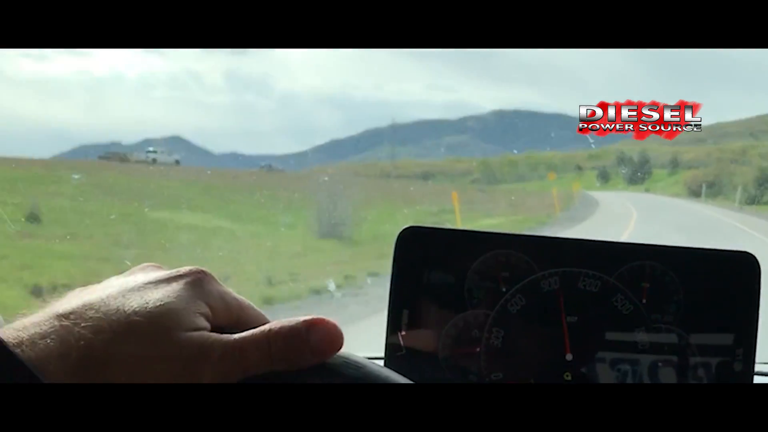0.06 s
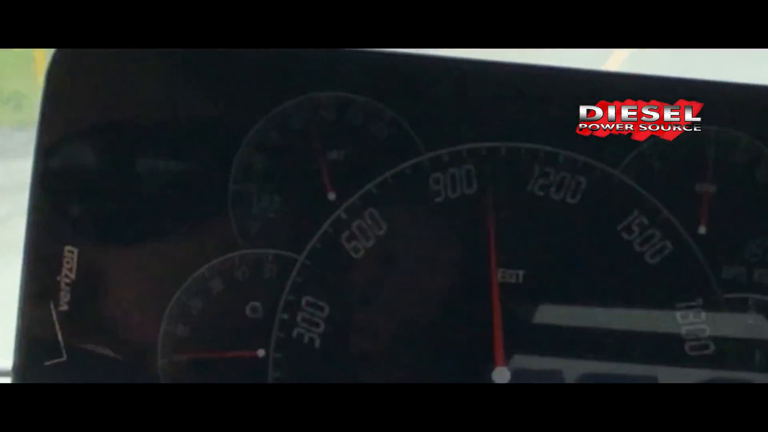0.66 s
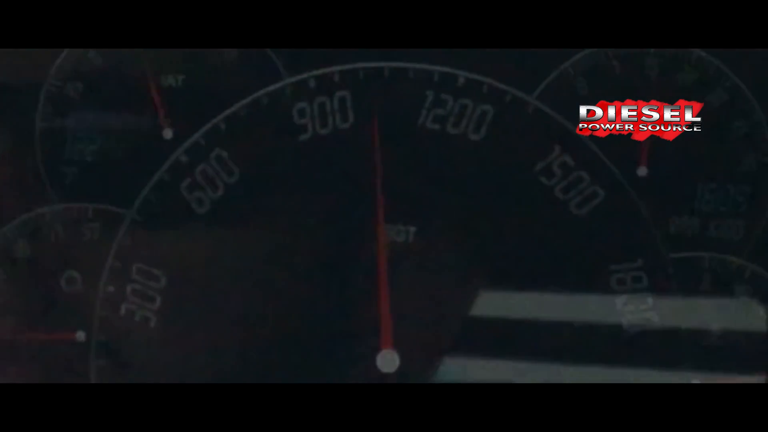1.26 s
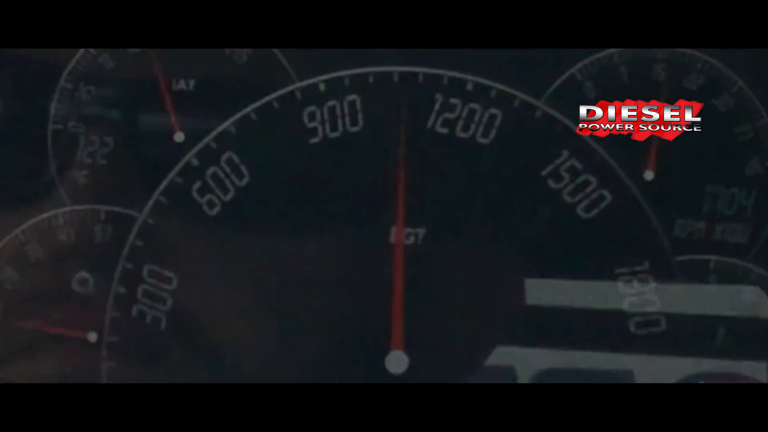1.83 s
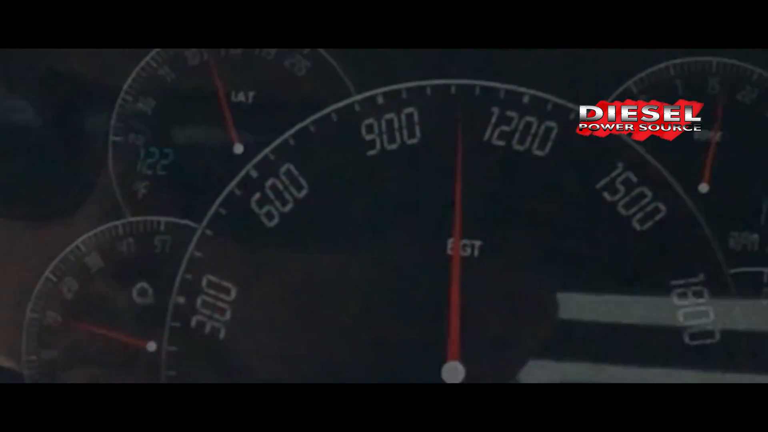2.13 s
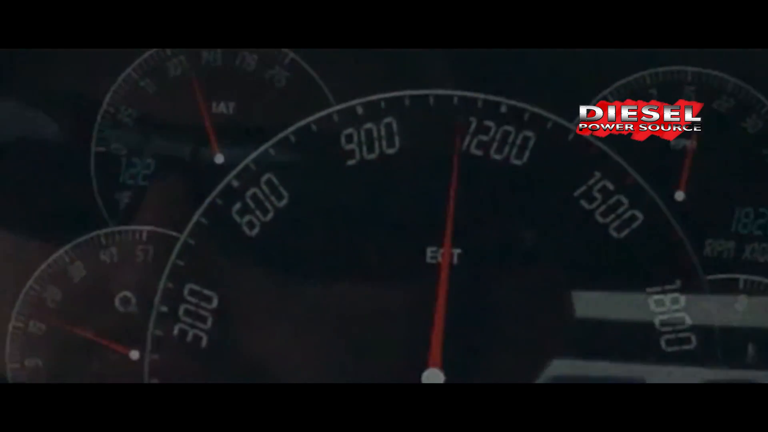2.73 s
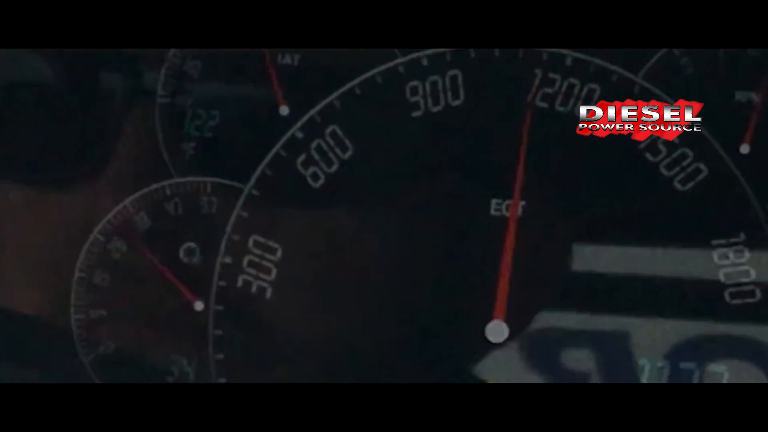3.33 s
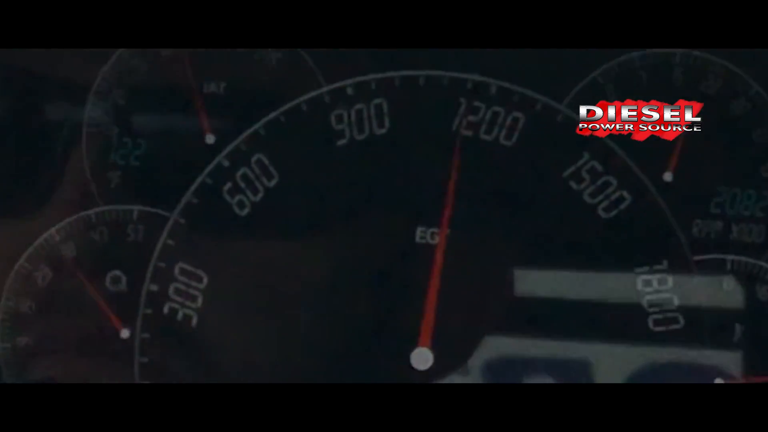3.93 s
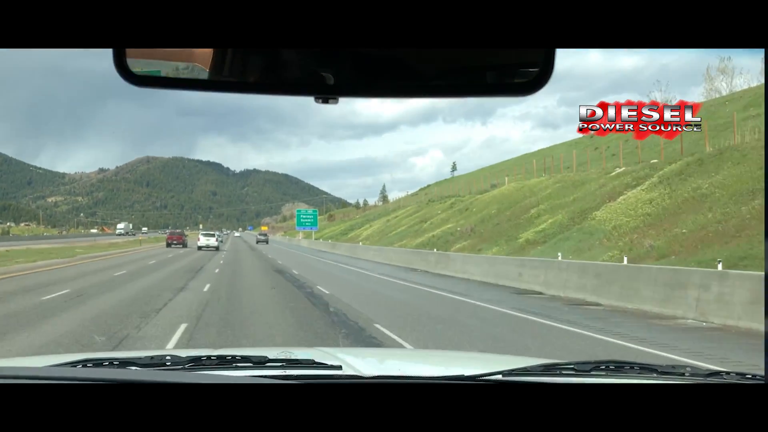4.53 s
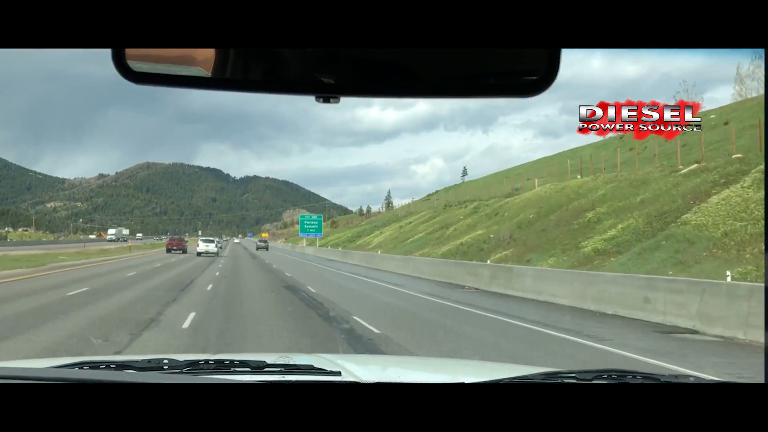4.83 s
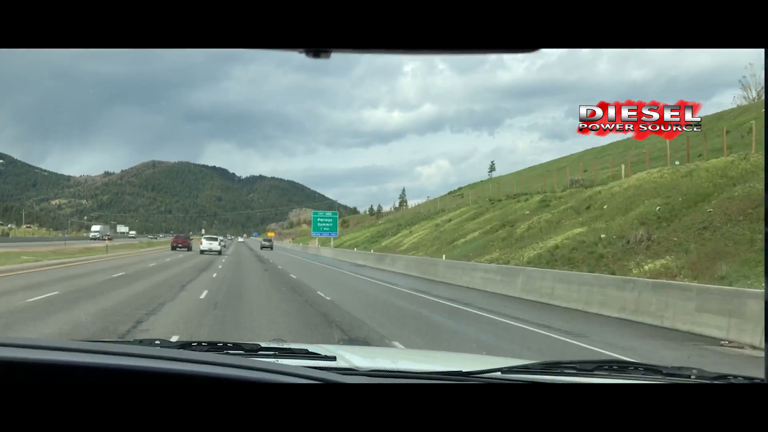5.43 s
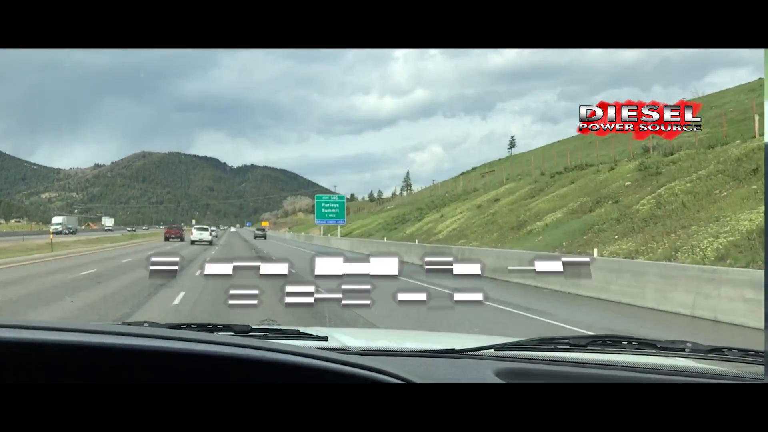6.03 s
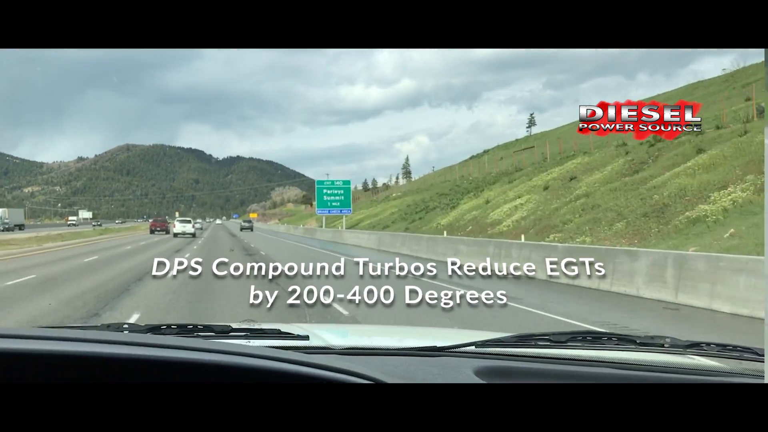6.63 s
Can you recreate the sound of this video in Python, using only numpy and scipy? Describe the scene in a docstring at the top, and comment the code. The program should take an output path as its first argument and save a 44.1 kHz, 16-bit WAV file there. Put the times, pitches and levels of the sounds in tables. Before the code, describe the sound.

A diesel truck pulls a heavy load uphill, heard from inside the closed cab. It opens with a very brief low thump, straight into a deep engine boom that climbs steadily in pitch for the whole six and a half seconds or so, swelling and dipping as the cab resonates. Exhaust pulsing and fine, rapid injector clatter run throughout. A thin turbo whistle starts faint, sweeps upward most quickly between about 1.5 and 4 seconds, flaring as it goes, then stays very high and creeps upward amid airy intake hiss. Low road rumble grows from around 2 seconds and is strongest shortly before 5. Faint, soft rustles pass in the first second or so, and again near 4 and 6 seconds. One close, dry tick sounds at about 6.4 seconds, with the engine still pulling.

```python
"""A deep engine boom climbs steadily, heard inside the cab: a six-cylinder turbo diesel pulling a heavy
load up a grade. The firing note swells and cancels as it crosses the cab's standing waves. Each firing
puffs down the exhaust and knocks through the dash as injector clatter. Two turbos in series spool up
to a high whistle over intake hiss and road rumble, with a few soft rustles and one dry tick."""
import sys
import numpy as np
from scipy.fft import rfft, irfft, next_fast_len
from scipy.io import wavfile
from scipy.ndimage import map_coordinates

SR = 44100
rng = np.random.default_rng(int(sys.argv[2]) if len(sys.argv) > 2 else 0)


def transcribe(u):
    """Save the signal u as a 16-bit wav file named by the first command-line argument.

    u: samples, shape (n,) or (channels, n), limited to [-1, 1]; the rate is SR.
    q: integer samples, one column per channel.
    """
    v = np.clip(np.atleast_2d(u).T, -1, 1)
    q = np.round(v * 32767).astype(np.int16)
    wavfile.write(sys.argv[1], SR, q)


N = 294588

# cab noise likeness: freq_hz, left_right_correlation
STEREO_LIKENESS = [(25, .988), (100, .994), (250, .98), (400, .92), (600, .88), (1000, .925), (2500, .93),
                   (3800, .97), (4900, 1)]
# noise spectra: freq_hz, relative_db
ROAD_SPECTRUM = [(17, -57), (25, -8), (38, -8), (60, -3.5), (90, -6.5), (150, -14.5), (300, -24),
                 (800, -60)]
RUSTLE_SPECTRUM = [(800, -17), (2500, -4), (4500, 0), (6400, -2), (7500, -10), (9000, -5), (10500, -13.5),
                   (15000, -16)]
INTAKE_SPECTRUM = [(2000, 6.5), (5000, -5.5), (8800, 5), (9800, -1), (10450, -11.5), (11400, 0.5),
                   (12500, -4), (13500, -5), (15800, -17)]
EXHAUST_SPECTRUM = [(40, -41), (90, 9.5), (150, 17), (220, 10.5), (300, 12), (380, 5.5), (520, 3), (600, 0),
                    (670, 2), (760, -2.5), (940, -0.5), (1100, -13), (2000, -15.5), (6000, -46)]
CLATTER_SPECTRUM = [(300, -46), (700, -6.5), (1000, -7.5), (1350, -5), (2250, -7.5), (2700, -8.5),
                    (4200, -12.5), (5100, -15.5), (6500, -17), (7400, -21.5), (15000, -42)]
# block and valve train response: freq_hz, relative_db
BUZZ_SPECTRUM = [(200, -15.5), (330, 1.5), (420, 4.5), (560, -3), (680, -10), (760, -18), (930, -7.5),
                 (1200, -21.5), (1600, -37)]
# level curves: time_s, relative_db
ROAD_ENVELOPE = [(0.1, -34), (1.6, -43), (1.82, -32), (4.05, -27), (4.7, -24.5), (5.01, -28), (6.6, -28)]
CLATTER_ENVELOPE = [(0.1, -39.5), (0.82, -38.5), (2.53, -43), (4.55, -39), (6.31, -39), (6.6, -38.5)]
# soft rustles: centre_s, half_length_s, level_db
RUSTLE_SWELLS = [(.42, .06, -48.5), (0.848, 0.6, -49.5), (2.306, 0.013, -55), (4.203, .025, -44),
                 (6.1, 0.052, -51)]
# dry tick: start_s, peak_db
TICK_EVENTS = [(6.4372, -10)]
# intake duct, dash panel and cab air modes: centre_hz, width_hz, gain_db
DUCT_RESONANCES = [(4860, 260, -7), (5190, 170, 7), (5440, 60, 6), (5700, 70, 7), (6020, 260, 12),
                   (7260, 130, 7), (7570, 330, 8), (8010, 200, -7), (8216, 45, 10), (8396, 65, 14),
                   (8495, 50, 7), (8650, 100, 9), (8920, 300, -6), (8937, 30, 6)]
DASH_RESONANCES = [(834, 81, 10), (956, 16, 14), (1162, 176, 8.5), (1604, 62, 8.5), (1766, 130, 3),
                   (2000, 80, 3), (2230, 106, 5.5), (3920, 150, 1), (6000, 130, 6), (6380, 98, 8)]
CAB_RESONANCES = [(59.7, 2.8, 7.5), (83.15, 7.7, 17), (96.5, 3.26, -10), (97.4, 10.8, 10.5), (107.6, 12, 5),
                  (110.1, 1.3, -8), (126, 6, -7), (141, 8.1, 4.5), (149.7, 10.4, 18.5), (165.3, 5.8, -10),
                  (180.6, 19.5, 7.5), (202.6, 21, 9.5), (229.4, 11, 8.5), (251.8, 25, -4.5),
                  (277.3, 28.4, 12.5), (307, 9.6, 8.5), (394.6, 14, 8)]
# spool-up: base_hz, boost_span_hz, halfway_s, time_constant_s, revs_span_hz
BIG_SPOOL = (9800, 1930, 2.1, .28, -30)
SMALL_SPOOL = (3917, 4430, 2.624, .704, 715)
# engine speed: time_s, firing_hz
FIRING_RATE = [(0, 77.6), (1, 81.9), (1.5, 84.9), (2.5, 93.6), (3.5, 103.8), (4.5, 112.5), (5, 117.1),
               (6, 124.8), (6.68, 132)]
# firing note, then its partners, ahead of the cab modes: cycle_multiple, low_revs_db, high_revs_db
MAIN_ORDERS = [(6, -26.5, -16.5), (9, -40.5, -35), (12, -33.5, -35.5), (18, -35.5, -49.5)]
# weaker lines from unequal cylinders: cycle_multiple, low_revs_db, high_revs_db
WEAK_ORDERS = [(3, -37, -28.5), (4, -54.5, -36), (5, -41.5, -51), (7, -64, -38.5), (8, -40, -42.5),
               (10, -53.5, -33.5), (11, -50.5, -37.5), (13, -55, -40.5), (14, -66, -45), (15, -43, -43.5),
               (20, -50, -56), (21, -52.5, -48.5), (22, -58, -54), (24, -51, -61.5), (30, -45.5, -47)]

CYLINDERS = 6
EXHAUST_DB, BUZZ_DB = (-33, -27.5), (-46.5, -42)  # lowest revs, highest revs
INTAKE_DB, WHINE_DB = (-60.5, -47.5), (-69, -61)  # off boost, full boost
WHISTLE_DB, RUSH_DB = (-55, -44), (-58, -43)  # off boost, full boost


def amp(db):
    """Decibels to gain."""
    return 10 ** (np.asarray(db) / 20)


def unit(x):
    """Scale to rms 1."""
    return x / np.sqrt(np.mean(np.abs(x) ** 2) + 1e-20)


def between(ends, share):
    """Blend from ends[0] at share 0 to ends[1] at share 1."""
    return ends[0] + (ends[1] - ends[0]) * share


def along(points, hz):
    """Interpolate (freq_hz, value) rows on a log axis."""
    freq_hz, values = np.transpose(points)
    return np.interp(np.log(hz + 1), np.log(freq_hz + 1), values)


def curve(points):
    """Interpolate (time_s, value) rows per sample."""
    return np.interp(np.arange(N) / SR, *np.transpose(points))


def wobble(rate_hz):
    """Smooth curve through random knots."""
    knots = rng.standard_normal(int(N * rate_hz / SR) + 4)
    return map_coordinates(knots, [np.arange(N) * rate_hz / SR])


def phase_rad(hz):
    """Running phase of a changing frequency."""
    return 2 * np.pi * np.cumsum(hz) / SR


def filtered(x, response):
    """Apply the gain response(hz)."""
    size = next_fast_len(N + SR // 4)
    return irfft(rfft(x, size) * response(np.fft.rfftfreq(size, 1 / SR)), size)[..., :N]


def flutter(width_hz):
    """Complex low-pass noise, rms 1; spreads a tone into a band."""
    real, imag = filtered(rng.standard_normal((2, N)), lambda hz: np.exp(-hz / width_hz))
    return unit(real + 1j * imag)


def resonance_db(modes, hz):
    """Summed gain of peaks and notches."""
    return sum(db / (1 + (2 * (hz - centre_hz) / width_hz) ** 2) for centre_hz, width_hz, db in modes)


def cab_ripple(hz, depth_db, spacing_hz):
    """Many cab reflections ripple a spectrum with peaks and notches."""
    return amp(depth_db * map_coordinates(rng.standard_normal(SR), [hz / spacing_hz]))


def cab_noise(spectrum, gate=1, modes=()):
    """Gated, coloured noise, rms 1, rippled by the cab and nearly alike on both sides."""
    def response(hz):
        colour = amp(along(spectrum, hz) + resonance_db(modes, hz))
        ripple = cab_ripple(hz, depth_db=1.9 * hz / (hz + 1800), spacing_hz=50)
        spread_rad = np.arccos(np.clip(along(STEREO_LIKENESS, hz), -1, 1)) / 2
        return colour * ripple * [np.cos(spread_rad), np.sin(spread_rad)]
    mid, side = filtered(gate * rng.standard_normal((2, N)), response)
    return unit(np.array([mid + side, mid - side]))


def road_rumble():
    """Low road noise through the cab."""
    return amp(curve(ROAD_ENVELOPE) + 3.5) * cab_noise(ROAD_SPECTRUM)


def rustles(side_gain=0.078):
    """Soft swells of brushing noise."""
    t = np.arange(N) / SR
    swells = sum(amp(db) * np.exp(-((t - centre_s) / half_s) ** 2)
                 for centre_s, half_s, db in RUSTLE_SWELLS)
    mid, side = unit(filtered(rng.standard_normal((2, N)), lambda hz: amp(along(RUSTLE_SPECTRUM, hz))))
    return swells * (mid + side_gain * side * [[1], [-1]])


def tick(t60_s=0.0036):
    """Close, dry tick: a sudden step that relaxes."""
    out, t = np.zeros(N), np.arange(SR // 50) / SR
    for start_s, peak_db in TICK_EVENTS:
        out[round(start_s * SR):][:len(t)] -= amp(peak_db - 60 * t / t60_s)
    return out


def thump_gain(length_s=.031, gain_db=13):
    """The sound begins with a brief, loud low thump."""
    return amp(curve([(length_s - .004, gain_db), (length_s, 0)]))


def intake_hiss(boost):
    """Intake air, louder with boost."""
    return amp(between(INTAKE_DB, boost)) * cab_noise(INTAKE_SPECTRUM)


def spool(turbo, revs):
    """S-curve spool-up: boost (0-1) and blade_hz."""
    base_hz, boost_span_hz, halfway_s, lag_s, revs_span_hz = turbo
    boost = 1 / (1 + np.exp((halfway_s - np.arange(N) / SR) / lag_s))
    return boost, base_hz + boost_span_hz * boost + revs_span_hz * revs


def big_turbo(boost, blade_hz):
    """The higher compressor: a faint line that comes and goes in a blur of air."""
    line = amp(3 * wobble(rate_hz=5)) * flutter(width_hz=70)
    air = flutter(width_hz=600)
    return .7 * amp(between(WHINE_DB, boost)) * np.real((line + air) * np.exp(1j * phase_rad(blade_hz)))


def small_turbo(boost, blade_hz):
    """Blade tone flaring at each duct resonance, in a rush of air tearing off the blades."""
    blade_rad = phase_rad(blade_hz + 6 * wobble(rate_hz=14))
    whistle_db = between(WHISTLE_DB, boost) + resonance_db(DUCT_RESONANCES, blade_hz)
    rush_db = between(RUSH_DB, boost ** 2)
    sweep_hz_per_s = np.gradient(blade_hz) * SR
    depth = .45 + (sweep_hz_per_s / 1300) ** 2
    flicker = (1 + depth * flutter(width_hz=18)) / np.hypot(1, depth)
    tone = amp(whistle_db) * flicker + amp(rush_db) * flutter(width_hz=580)
    octave = amp(rush_db - 11) * flutter(width_hz=700)
    return np.real(tone * np.exp(1j * blade_rad) + octave * np.exp(2j * blade_rad))


def block_buzz(cycle_rad, revs, size=4096, orders=80):
    """Block and valve train shake alike every cycle; the lines climb through the cab's ripple."""
    strength = np.where(np.arange(orders) % 3, .45, 1)
    one_cycle = irfft(strength * np.exp(2j * np.pi * rng.random(orders)), size)
    shake = np.interp(cycle_rad / (2 * np.pi), np.arange(size) / size, one_cycle, period=1)
    def response(hz):
        return amp(along(BUZZ_SPECTRUM, hz)) * cab_ripple(hz, depth_db=2.8, spacing_hz=22)
    return amp(between(BUZZ_DB, revs)) * unit(filtered(shake, response))


def firing_bursts(cycle_rad, decay, uneven_db):
    """One decaying burst per firing; each cylinder has its own strength."""
    firings = cycle_rad * CYLINDERS / (2 * np.pi)
    strength = amp(uneven_db * unit(rng.standard_normal(CYLINDERS)))
    return strength[firings.astype(int) % CYLINDERS] * np.exp(-decay * (firings % 1))


def combustion(cycle_rad, revs):
    """Each firing sends a puff down the exhaust and a knock through the dash panels."""
    puffs = firing_bursts(cycle_rad, decay=0.29, uneven_db=0.5)
    exhaust = cab_noise(EXHAUST_SPECTRUM, puffs)
    knocks = firing_bursts(cycle_rad, decay=0.23, uneven_db=0.46)
    clatter = cab_noise(CLATTER_SPECTRUM, knocks, DASH_RESONANCES)
    exhaust_db = between(EXHAUST_DB, revs) + 0.11 * wobble(rate_hz=5.7)
    clatter_db = curve(CLATTER_ENVELOPE) + 1.5 + 0.47 * wobble(rate_hz=15)
    return amp(exhaust_db) * exhaust + amp(clatter_db) * clatter


def engine_note(cycle_rad, firing_hz, revs, stereo_rad=0.021):
    """Wavering engine orders boom or cancel at the cab modes."""
    def line(row, waver):
        order = round(row[0])
        level_db = between(row[1:], revs) + resonance_db(CAB_RESONANCES, order * firing_hz / CYLINDERS)
        envelope = amp(level_db) * (1 + waver * flutter(width_hz=3.7))
        return envelope * np.exp(1j * (order * cycle_rad + rng.uniform(0, 2 * np.pi)))
    note = thump_gain() * line(MAIN_ORDERS[0], waver=0.019 + 0.36 * revs ** 2)
    note += sum(line(row, waver=.2) for row in MAIN_ORDERS[1:])
    note += sum(line(row, waver=.35) for row in WEAK_ORDERS)
    return np.real(note * np.exp(1j * stereo_rad * np.array([[1], [-1]])))


def scene():
    """Road, turbos and engine together in the cab."""
    firing_hz = curve(FIRING_RATE)
    cycle_rad = phase_rad(firing_hz / CYLINDERS)  # one turn per four-stroke cycle
    revs = (firing_hz - firing_hz.min()) / np.ptp(firing_hz)  # 0-1
    boost, blade_hz = spool(SMALL_SPOOL, revs)
    background = road_rumble() + intake_hiss(boost)
    engine = engine_note(cycle_rad, firing_hz, revs)
    engine += block_buzz(cycle_rad, revs) + combustion(cycle_rad, revs)
    turbos = small_turbo(boost, blade_hz) + big_turbo(*spool(BIG_SPOOL, revs))
    return background + rustles() + tick() + turbos + engine


def record(dry):
    """Brick-wall low-pass."""
    return filtered(dry, lambda hz: hz < 15850)


dry = scene()
out = record(dry)
transcribe(out)
```